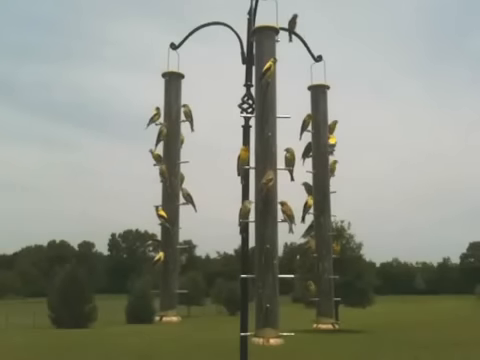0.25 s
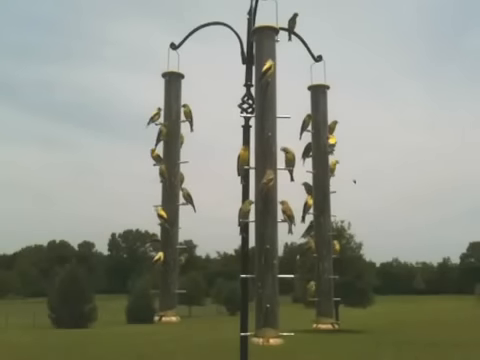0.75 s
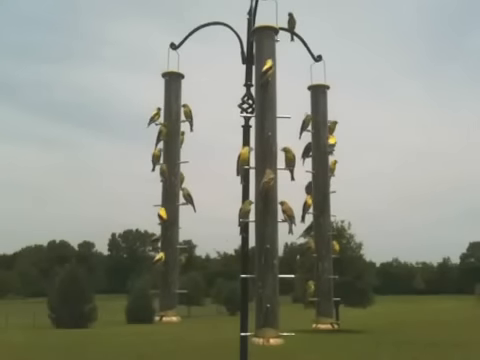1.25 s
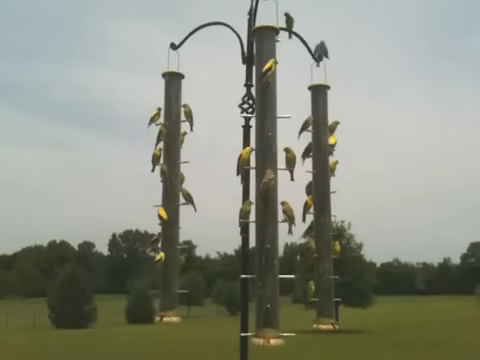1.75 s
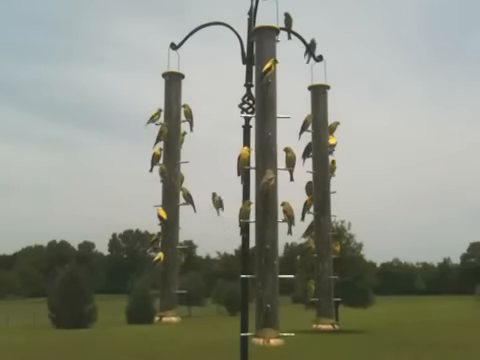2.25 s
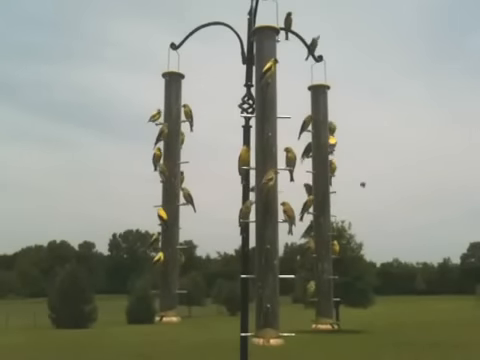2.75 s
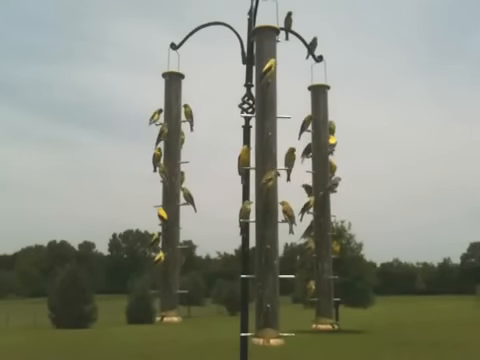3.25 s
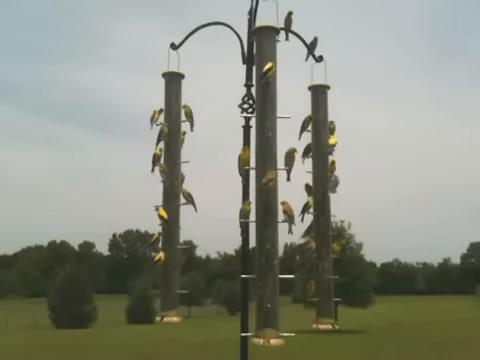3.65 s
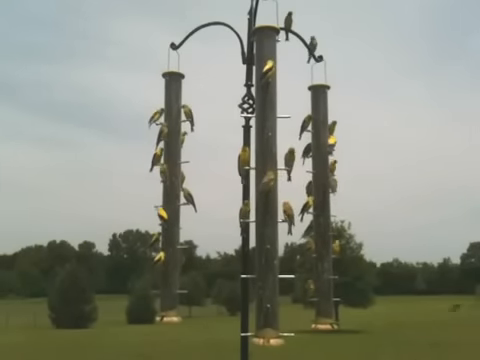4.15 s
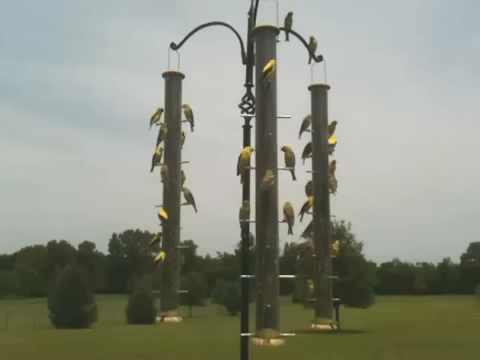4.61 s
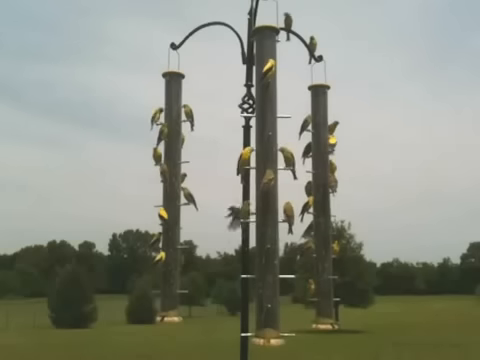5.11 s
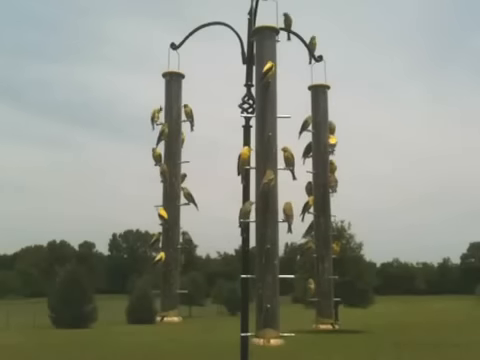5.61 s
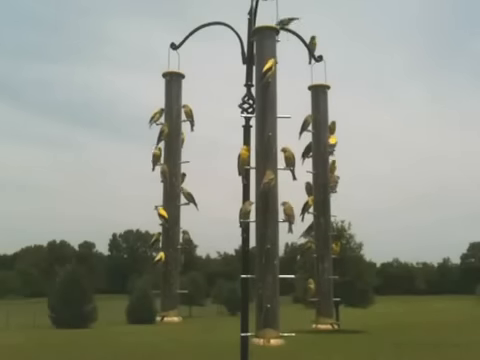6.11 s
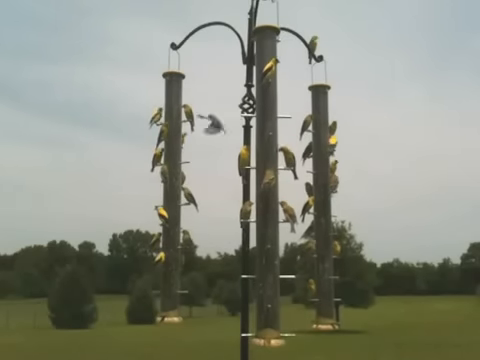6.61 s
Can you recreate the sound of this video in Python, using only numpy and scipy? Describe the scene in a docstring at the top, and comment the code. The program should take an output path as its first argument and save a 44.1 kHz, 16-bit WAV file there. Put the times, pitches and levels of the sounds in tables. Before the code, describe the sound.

Cicadas buzz steadily in the trees while goldfinches at garden feeders chirp in brief scattered runs and whistles.

```python
"""An open yard with garden feeders, giving little echo. Near the microphone goldfinches squabble:
rising whistles from both sides of the syrinx at once, and runs of quick falling chips.
Further off, other birds slur, pip and twitter. Behind them two cicada choruses hold steady in the
trees, a hollow drone and a high hiss. Far traffic and a faint motor hum lie underneath."""
import sys
import numpy as np
from scipy import signal
from scipy.fft import rfft, irfft, next_fast_len
from scipy.io import wavfile
from scipy.ndimage import uniform_filter1d

SR = 44100
rng = np.random.default_rng(int(sys.argv[2]) if len(sys.argv) > 2 else 0)


def file_out(sig):
    """Save sig as 16-bit WAV at sys.argv[1]."""
    # one column per channel
    cols = np.atleast_2d(sig).T
    # limit, then scale
    lim = np.clip(cols, -1, 1)
    pcm = np.round(lim * 32767).astype(np.int16)
    wavfile.write(sys.argv[1], SR, pcm)


N = 302963
TIME = np.arange(N) / SR

# spectra of the far road and of the cicadas in the trees: frequency_hz, relative_db
RUMBLE_SPECTRUM = [(20, -16), (45, -29), (70, -14.5), (100, -12), (140, 0), (190, 1.5), (240, -3),
                   (320, -19), (500, -36)]
ROAR_SPECTRUM = [(150, -18), (260, -0.5), (340, 2), (410, -2.5), (510, -1.5), (650, -2.5), (900, -2.5),
                 (1500, -19.5)]
DRONE_SPECTRUM = [(600, -24.5), (800, -17.5), (930, -15.5), (1030, -6), (1085, -4), (1122, 2), (1165, -3.5),
                  (1230, -10.5), (1350, -20), (1550, -28), (2000, -38)]
HISS_SPECTRUM = [(1500, -26), (2100, -26), (2700, -22.5), (3300, -19), (3900, -8), (4300, -5.5), (4850, -7),
                 (5450, 1.5), (6900, 0), (7900, -8), (9200, -13), (10000, -18.5), (11000, -22.5)]
# slow swells of the same four layers, each within its main band: time_s, level_db
RUMBLE_SWELL = [(0.0, -64.5), (0.8, -67.5), (2.4, -67.5), (3.25, -63.5), (3.6, -68.5), (4.45, -67.5),
                (5.45, -61.5), (5.75, -66), (6.87, -65)]
ROAR_SWELL = [(0.0, -66.5), (3.3, -67), (3.95, -64), (5.25, -63.5), (6.0, -65.5), (6.6, -62.1), (6.87, -65)]
DRONE_SWELL = [(0.0, -54.5), (0.6, -53.5), (3.2, -53.5), (5.4, -54), (5.8, -54.5), (6.87, -54.5)]
HISS_SWELL = [(0.0, -46.9), (0.35, -47.0), (0.9, -48.0), (1.4, -47.5), (2.2, -46.5), (2.8, -46),
              (3.6, -46.4), (4.0, -46.5), (5.0, -45.5), (5.35, -47), (5.8, -46.5), (6.1, -47.5),
              (6.5, -46.5), (6.87, -47)]
# tones of a distant motor: pitch_hz, level_db, fade_db_per_s
MOTOR_TONES = [(118.7, -69.5, 2.5), (218.8, -67.5, 0)]
# soft slurs of birds further off: start_s, length_s, start_hz, end_hz, base_db
FAR_SLURS = [(.401, .13, 4490, 3590, -62), (3.475, .046, 2900, 3470, -74), (4.71, 0.078, 2650, 3170, -71),
             (5.82, .15, 3540, 3240, -68.5), (6.318, .14, 3410, 3180, -68)]
# a far bird repeats one low arched note: start_s, base_db
FAR_PIPS = [(1.42, -72), (1.67, -71), (5.295, -68), (5.359, -69), (5.56, -69), (5.607, -69), (5.803, -69),
            (5.856, -67), (6.06, -68.5), (6.108, -69)]
# falling chips at the feeders: start_s, start_hz, end_hz, base_db, overtones_base_db, high_voice_gain
NEAR_CHIPS = [(1.287, 3400, 2880, -66, -76, 0.18), (1.463, 3350, 2250, -66, -78, 0.19),
              (2.016, 3460, 2530, -56, -70, 0), (2.144, 4640, 2350, -55.5, -55, 0),
              (2.264, 3960, 1940, -60.5, -73, .5), (2.399, 3660, 2130, -61, -68, 0),
              (4.057, 3370, 2750, -59.5, -60, 0), (4.178, 4500, 2350, -52.5, -56, 0),
              (4.303, 4080, 2180, -55.5, -51.5, 2.2), (4.383, 3600, 2970, -65, -60, 0),
              (4.424, 4260, 2470, -54, -52.5, 2.8), (5.396, 3340, 2670, -57, -52.5, 0.71),
              (5.521, 4350, 2240, -54.5, -56, 0), (5.638, 3830, 2080, -57.5, -53.5, 1.9),
              (5.766, 3750, 2200, -59.5, -55, 0.19)]
# two-voiced whistles at the feeders: start_s, length_s, rise_s, low_top_hz, sag_hz, high_top_hz, step_hz,
# low_base_db, high_base_db, high_fade_db; then, relative to the voices, the low one's harmonics and
# the sum tone: second_db, third_db, sum_db
NEAR_WHISTLES = [(-.026, 0.14, 0.051, 3166, 255, 4670, 160, -51.5, -51.5, 12, -9, 2.5, -6),
                 (.226, .122, 0.065, 3176, 4, 4740, -77, -48.5, -47.5, 14, -12, -3.5, -5),
                 (2.949, .157, .042, 2850, 230, 4270, 152, -55.5, -46, -5, 4, 4.5, -19),
                 (6.21, .157, 0.037, 2957, 297, 4210, 153, -55.7, -48.5, 13, -2, -8, -17)]


def undb(db):
    """Decibels to gain."""
    return 10 ** (np.asarray(db) / 20)


def swell(rows):
    """Gain over the scene, joining a table's levels by straight lines in dB."""
    times_s, levels_db = np.transpose(rows)
    return undb(np.interp(TIME, times_s, levels_db))


def wander(rate_hz, size=N):
    """Smooth random wander of spread about 1."""
    length = next_fast_len(size)
    hz = np.fft.rfftfreq(length, 1 / SR)
    drift = irfft(rfft(rng.standard_normal(length)) / (1 + (hz / rate_hz) ** 4), length)
    return drift[:size] / drift.std()


def wash(spectrum, band_hz, flicker_db, flicker_hz):
    """Many far sources merged: noise with rms about 1 inside band_hz, flickering in third-octave bands."""
    hz = np.fft.rfftfreq(N, 1 / SR) + 1
    points_hz, db = np.transpose(spectrum)
    colour = undb(np.interp(np.log(hz), np.log(points_hz), db))
    roll_off = (1 + (hz / (1.23 * points_hz[-1])) ** 8) * (1 + (0.87 * points_hz[0] / hz) ** 8)
    bins = rfft(rng.standard_normal(N)) * colour / roll_off
    bins /= irfft(bins * (hz > band_hz[0]) * (hz < band_hz[1]), N).std()
    out = np.zeros(N)
    for k in range(3):  # bands an octave apart flicker together
        share = np.cos(np.pi * (np.log2(hz) + k / 3)) ** 2 * 2 / 3
        out += irfft(bins * share, N) * undb(flicker_db * wander(flicker_hz))
    return out


def add(out, start_s, sound):
    """Mix a sound in at its time."""
    i = int(start_s * SR)
    sound, i = sound[max(-i, 0):], max(i, 0)
    out[i:i + len(sound)] += sound[:N - i]


def gate(t, edge_s):
    """Soft start and stop of a note."""
    return np.sin(np.pi / 2 * np.clip(np.minimum(t - t[0], t[-1] - t) / edge_s, 0, 1)) ** 2


def ease(t, span_s):
    """Falls from 1 to 0 over the span, levelling out as it arrives."""
    return np.clip(1 - t / span_s, 0, 1) ** 2


def traffic():
    """A far road: engine rumble and dull tyre roar."""
    rumble = wash(RUMBLE_SPECTRUM, band_hz=(80, 205), flicker_db=0.5, flicker_hz=5.4)
    roar = wash(ROAR_SPECTRUM, band_hz=(280, 700), flicker_db=1.64, flicker_hz=4.1)
    return swell(RUMBLE_SWELL) * rumble + swell(ROAR_SWELL) * roar


def motor_hum():
    """Two wavering tones of a distant motor; the lower one dies away."""
    out = np.zeros(N)
    for pitch_hz, level_db, fade_db_per_s in MOTOR_TONES:
        phase = 2 * np.pi * np.cumsum(pitch_hz * (1 + 0.0077 * wander(5.8))) / SR
        out += np.sqrt(2) * undb(level_db - fade_db_per_s * TIME + 0.97 * wander(5.1)) * np.sin(phase)
    return out


def cicadas():
    """Back in the trees, thousands of insects blur into a narrow drone and a broad hiss."""
    drone = wash(DRONE_SPECTRUM, band_hz=(950, 1300), flicker_db=1.26, flicker_hz=15)
    hiss = wash(HISS_SPECTRUM, band_hz=(5000, 7500), flicker_db=1.0, flicker_hz=20)
    return swell(DRONE_SWELL) * drone + swell(HISS_SWELL) * hiss


def syrinx(hz, jitter):
    """Phase of one membrane whose tension trembles slightly."""
    tremble = uniform_filter1d(rng.standard_normal(len(hz)), size=100) * np.sqrt(100)
    return 2 * np.pi * np.cumsum(hz * (1 + jitter * tremble)) / SR


def glide(length_s, start_hz, end_hz, arch_hz, jitter):
    """Phase, envelope and progress (0-1) of one short curved note."""
    t = np.arange(0, length_s, 1 / SR)
    progress = t / length_s
    hz = start_hz + (end_hz - start_hz) * progress + 4 * arch_hz * progress * (1 - progress)
    return syrinx(hz, jitter), np.sqrt(2) * gate(t, edge_s=0.0033), progress


def flock_twitter(count=110, lowest_hz=2627, highest_hz=4460):
    """The distant flock twitters at random, mostly low, half buried in the insects."""
    out = np.zeros(N)
    for when, pitch, slope, faintness in rng.random((count, 4)):
        height = pitch ** 2
        start_hz = lowest_hz + (highest_hz - lowest_hz) * height
        end_hz = start_hz - 600 * (slope - .3)
        level_db = -70.5 + 16 * height - 8 * faintness  # higher notes are louder
        phase, envelope, _ = glide(0.0413, start_hz, end_hz, arch_hz=118, jitter=0.022)
        add(out, when * N / SR, undb(level_db) * envelope * np.sin(phase))
    return out


def slurs_and_pips(pip_s=0.0435, pip_hz=(2470, 2440), pip_arch_hz=161):
    """Birds further off: only a wavering fundamental carries to the microphone."""
    out = np.zeros(N)
    slurs = [(*slur, 0) for slur in FAR_SLURS]  # straight glides, no arch
    pips = [(start_s, pip_s, *pip_hz, base_db, pip_arch_hz) for start_s, base_db in FAR_PIPS]
    for start_s, length_s, start_hz, end_hz, base_db, arch_hz in slurs + pips:
        phase, envelope, _ = glide(length_s, start_hz, end_hz, arch_hz, jitter=.028)
        level_db = base_db + 1.5 + 1.5 * wander(50, size=len(phase))
        add(out, start_s, undb(level_db) * envelope * np.sin(phase))
    return out


def beak_gain(hz, centre_hz=8300, width_hz=910, depth_db=11.6):
    """An overtone is at full strength on the resonance of throat and beak, and weaker elsewhere."""
    return undb(depth_db / (1 + (2 * (hz - centre_hz) / width_hz) ** 2) - depth_db)


def chip_sweep(length_s, start_hz, end_hz, base_db, overtones_base_db):
    """A quick, rough sweep that weakens as it falls; overtones flash through the beak resonance."""
    phase, envelope, progress = glide(length_s, start_hz, end_hz, arch_hz=-68, jitter=0.0197)
    hz = np.gradient(phase) * SR / (2 * np.pi)
    second, third, fourth = (beak_gain(k * hz) * np.sin(k * phase) for k in (2, 3, 4))
    body = undb(base_db + 4 - 13.4 * progress ** 2) * (np.sin(phase) + undb(-6) * second)
    overtones_db = overtones_base_db + 6 + 2 * wander(110, size=len(phase))
    return envelope * (body + undb(overtones_db) * (third + undb(-2) * fourth))


def goldfinch_chips(fall_hz_per_s=120000, join_s=.018):
    """At the feeders, each chip is a sweep of the low voice; in some the high voice joins halfway."""
    out = np.zeros(N)
    for start_s, start_hz, end_hz, base_db, overtones_base_db, high_voice_gain in NEAR_CHIPS:
        length_s = .029 + (start_hz - end_hz) / fall_hz_per_s  # a wider fall takes longer
        low = chip_sweep(length_s, start_hz, end_hz, base_db, overtones_base_db)
        # the high voice starts above the low one and drops quickly, always to the same pitch
        high = chip_sweep(.02, 1.16 * start_hz, 3450, base_db, overtones_base_db - 13)
        add(out, start_s, low)
        add(out, start_s + join_s, high_voice_gain * high)
    return out


def goldfinch_whistles(scoop=.29, release_s=0.038, step_at_s=.102, step_s=0.0069, dip_hz=80, droop_hz=90):
    """At the feeders, both membranes of the syrinx scoop up together and mix into sum tones."""
    out = np.zeros(N)
    for (start_s, length_s, rise_s, low_top_hz, sag_hz, high_top_hz, step_hz,
         low_base_db, high_base_db, high_fade_db, second_db, third_db, sum_db) in NEAR_WHISTLES:
        t = np.arange(0, length_s, 1 / SR)
        onset, release = ease(t, rise_s), ease(length_s - t, release_s)
        low_hz = low_top_hz * (1 - scoop * onset) - sag_hz * ease(length_s - t, length_s - rise_s)
        # the high voice arrives later, dips, steps to a new pitch and droops as the call closes
        high_hz = high_top_hz * (1 - scoop * ease(t, 1.35 * rise_s)) - droop_hz * release
        switch = (t - step_at_s) / step_s
        high_hz += step_hz * (1 + np.tanh(switch)) / 2 - dip_hz * np.exp(-.5 * (switch + 1) ** 2)
        # effort swells and is released; the high voice follows it more steeply
        effort_db = -11.5 * onset - 12 * release
        low_db = low_base_db + effort_db
        high_db = high_base_db + 1.76 * effort_db - high_fade_db * (t / length_s - .5)
        low_phase, high_phase = syrinx(low_hz, jitter=0.0058), syrinx(high_hz, jitter=0.0028)
        voices = undb(low_db) * np.sin(low_phase) + undb(high_db) * np.sin(high_phase)
        sum_tones = np.sin(low_phase + high_phase) + undb(-6.5) * np.sin(2 * low_phase + high_phase)
        overtones = undb((low_db + high_db) / 2 + sum_db) * sum_tones
        overtones += undb(low_db + second_db) * np.sin(2 * low_phase)
        overtones += undb(low_db + third_db) * np.sin(3 * low_phase)
        overtones += undb(high_db - 23) * np.sin(2 * high_phase)
        # overtones grow as the beak opens in mid-call
        beak_opening = gate(t, edge_s=0.031) * undb(2 * wander(60, size=len(t)))
        add(out, start_s, np.sqrt(2) * gate(t, edge_s=0.0014) * (voices + beak_opening * overtones))
    return out


def yard(direct, wet_db, t60_s):
    """Thin scatter from the house wall, lawn and trees, 12 ms behind the direct sound."""
    t = np.arange(SR // 2) / SR
    tail = rng.standard_normal(len(t)) * np.exp(-np.log(1000) * t / t60_s) * (t > .012)
    return direct + undb(wet_db) * signal.fftconvolve(direct, tail / np.linalg.norm(tail))[:N]


def scene():
    """One microphone in the yard: near and far birds over the insects, the road and the motor."""
    near = yard(goldfinch_whistles() + goldfinch_chips(), wet_db=-12, t60_s=0.097)
    far = yard(slurs_and_pips() + flock_twitter(), wet_db=-11, t60_s=.25)
    return (near + far + cicadas() + traffic() + motor_hum())[None]


def record(dry):
    """The microphone feeds a camera, which cuts the top steeply."""
    top_hz = 11150
    return signal.sosfilt(signal.ellip(12, .1, 70, top_hz, fs=SR, output="sos"), dry)


dry = scene()
out = record(dry)
file_out(out)
```